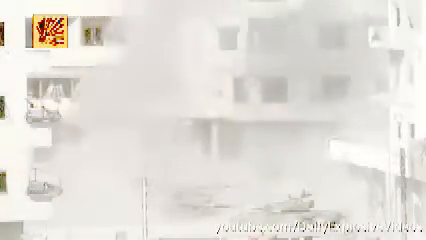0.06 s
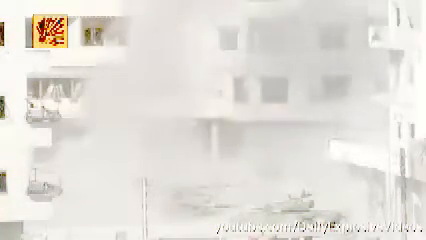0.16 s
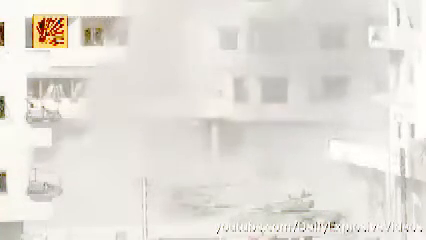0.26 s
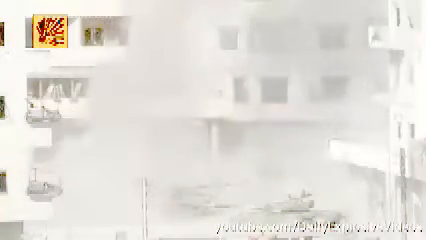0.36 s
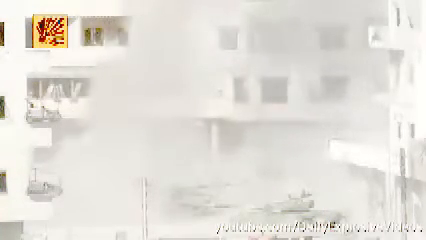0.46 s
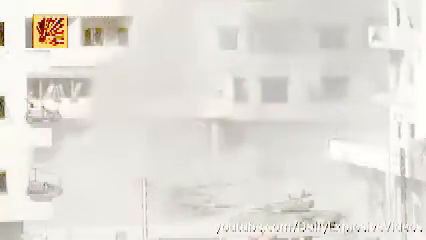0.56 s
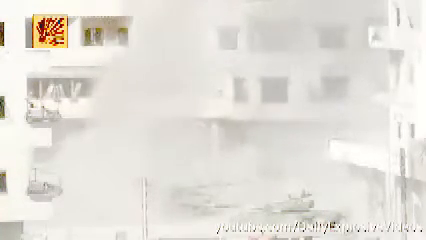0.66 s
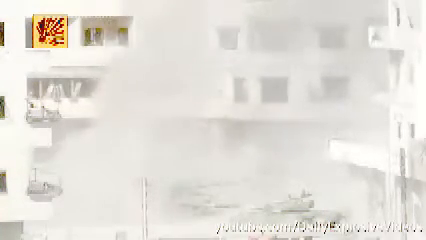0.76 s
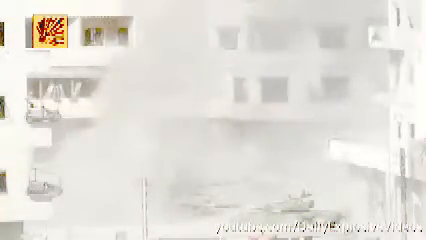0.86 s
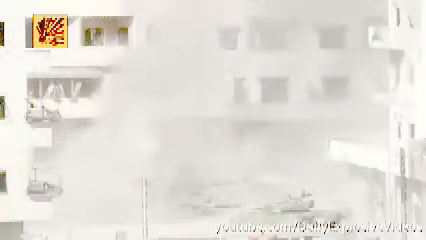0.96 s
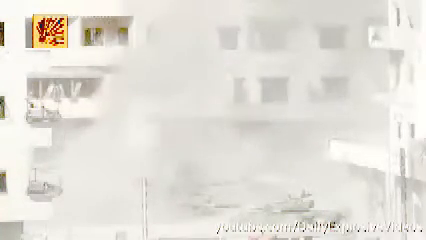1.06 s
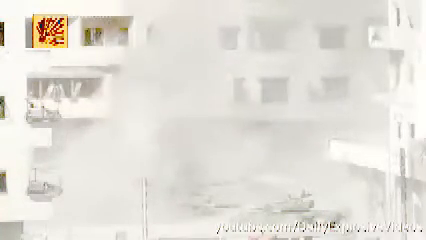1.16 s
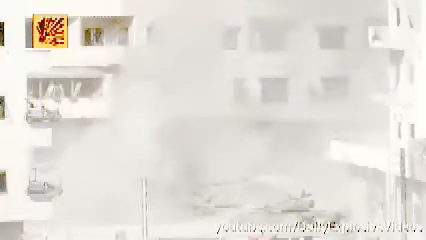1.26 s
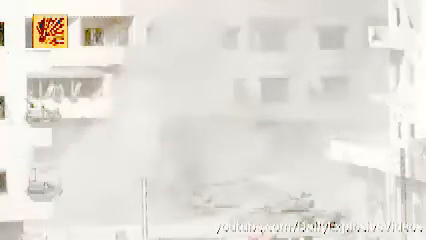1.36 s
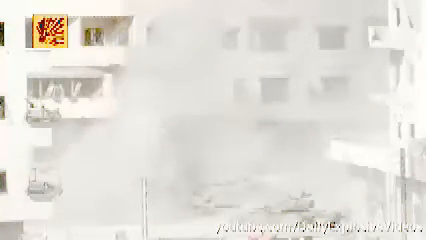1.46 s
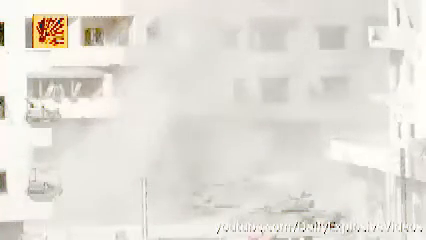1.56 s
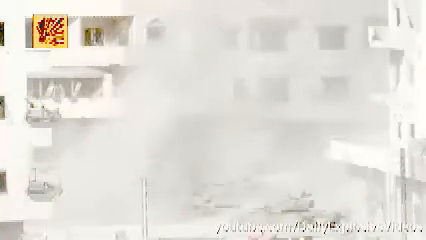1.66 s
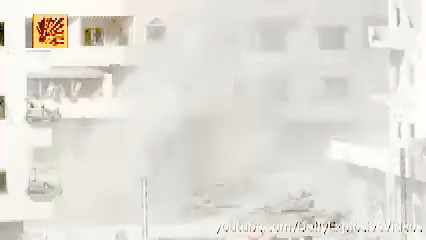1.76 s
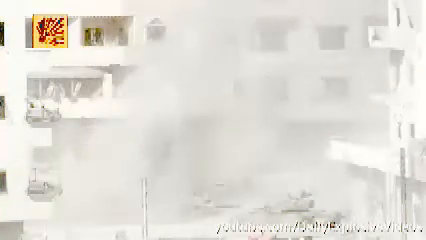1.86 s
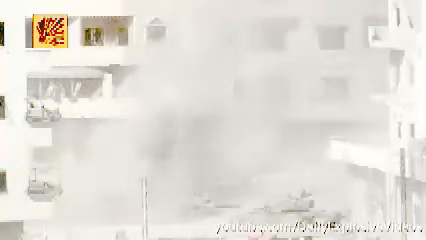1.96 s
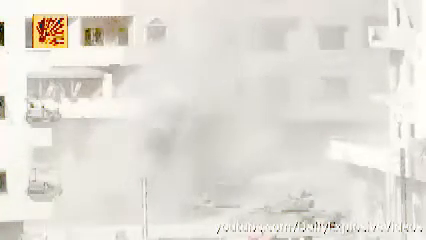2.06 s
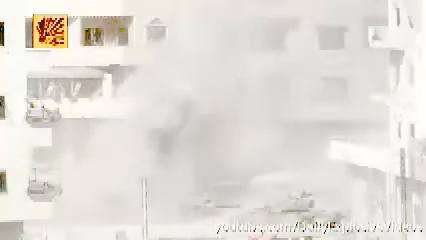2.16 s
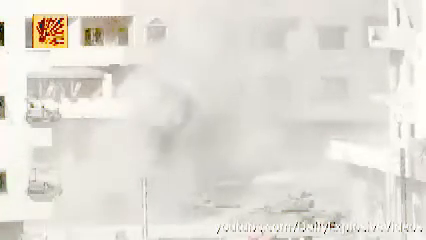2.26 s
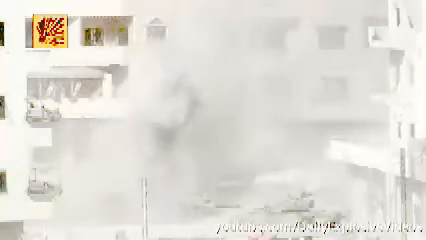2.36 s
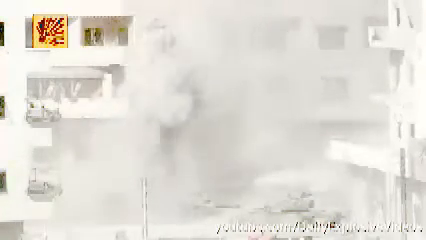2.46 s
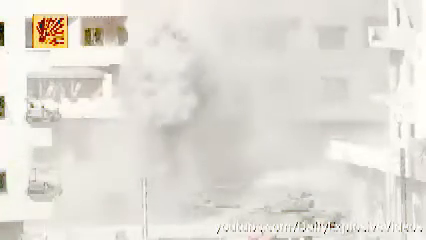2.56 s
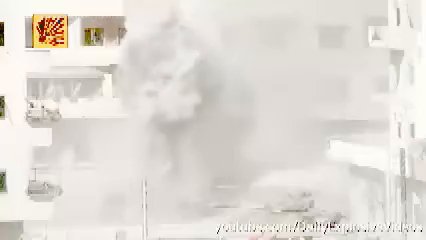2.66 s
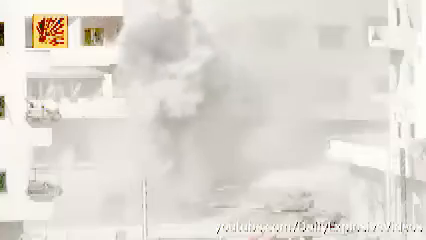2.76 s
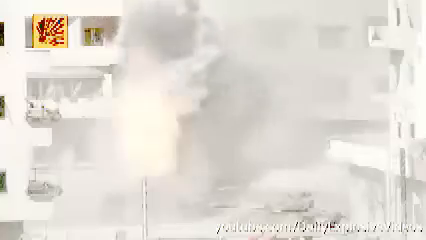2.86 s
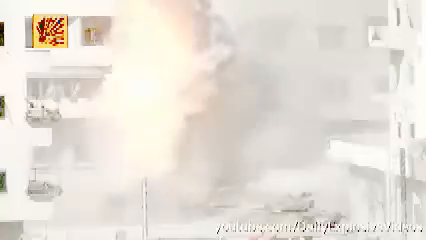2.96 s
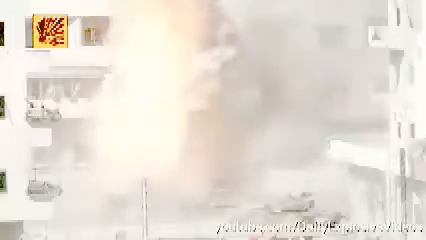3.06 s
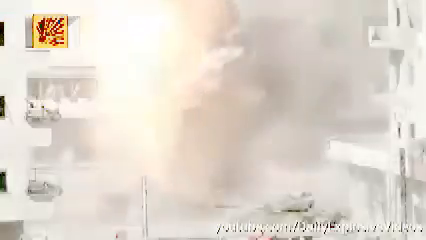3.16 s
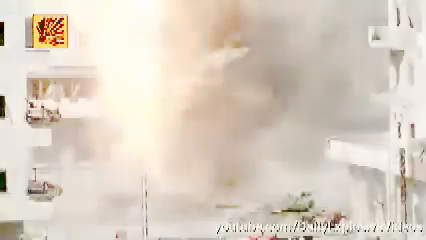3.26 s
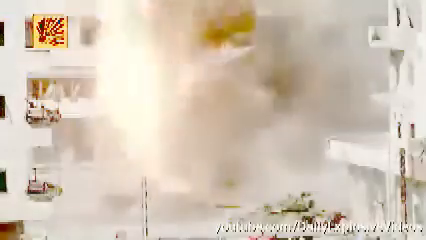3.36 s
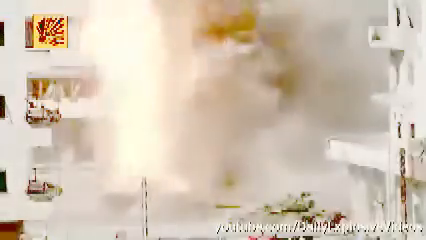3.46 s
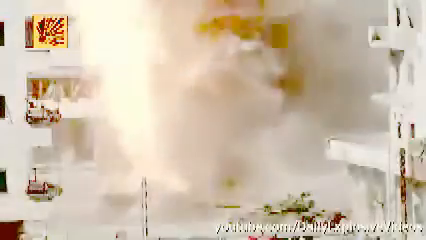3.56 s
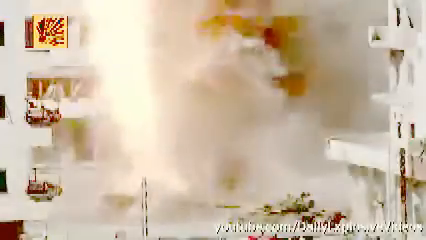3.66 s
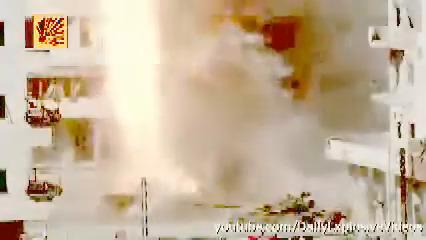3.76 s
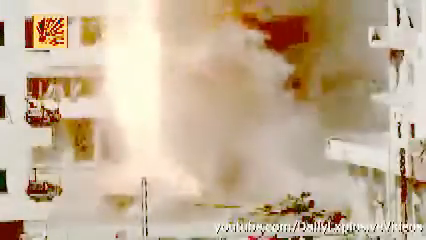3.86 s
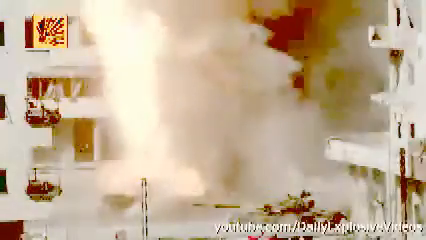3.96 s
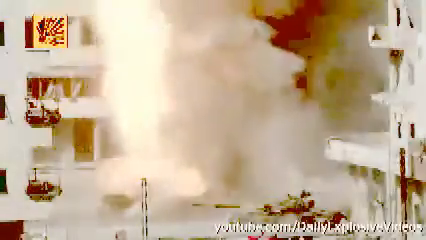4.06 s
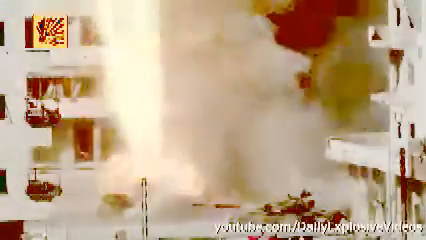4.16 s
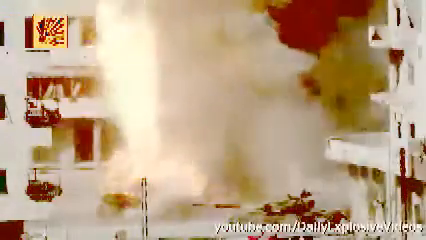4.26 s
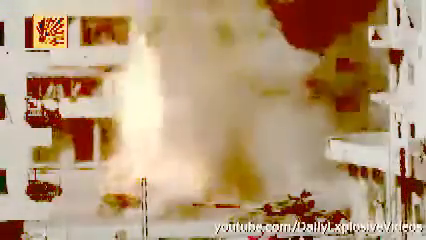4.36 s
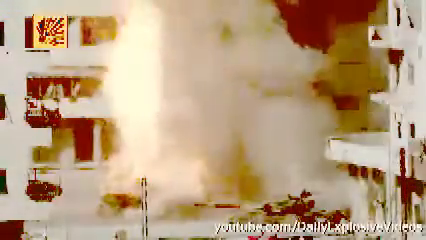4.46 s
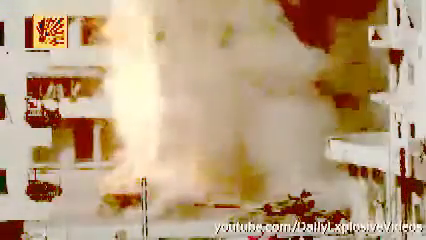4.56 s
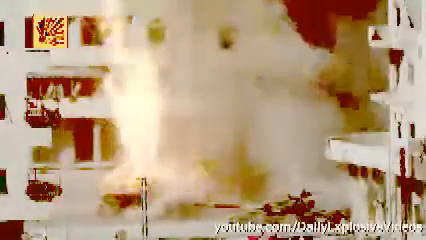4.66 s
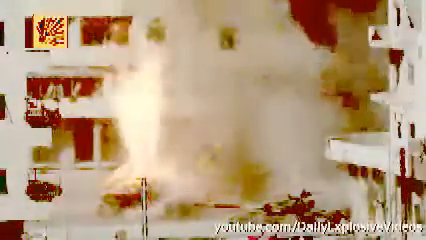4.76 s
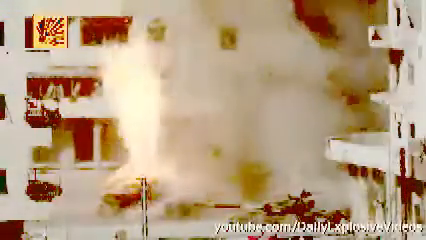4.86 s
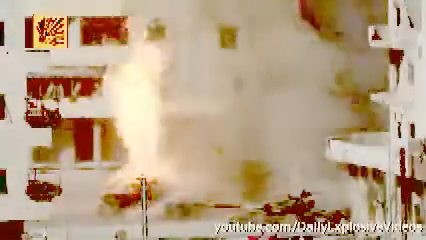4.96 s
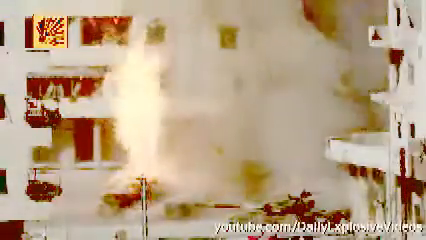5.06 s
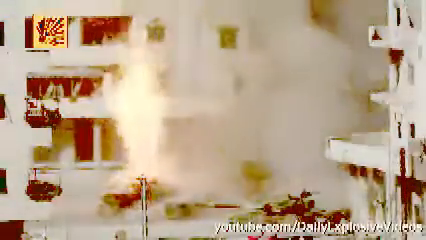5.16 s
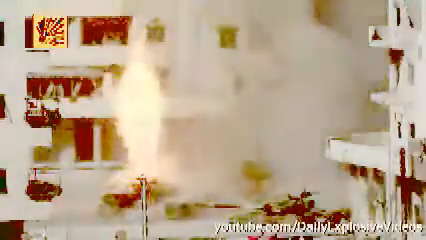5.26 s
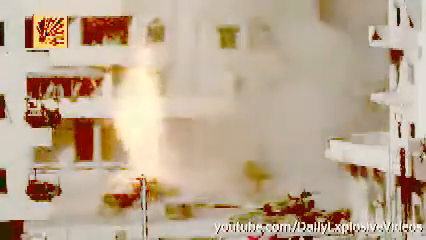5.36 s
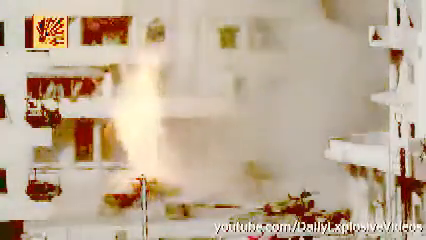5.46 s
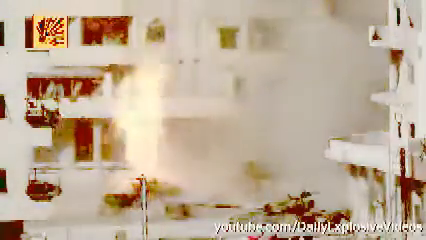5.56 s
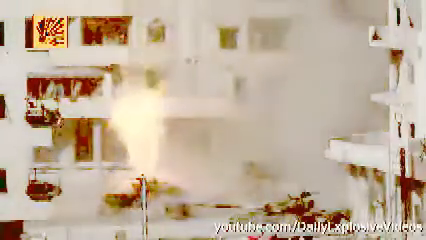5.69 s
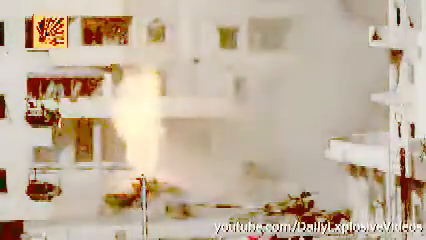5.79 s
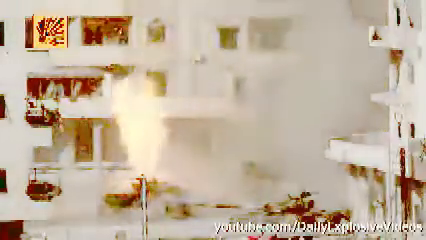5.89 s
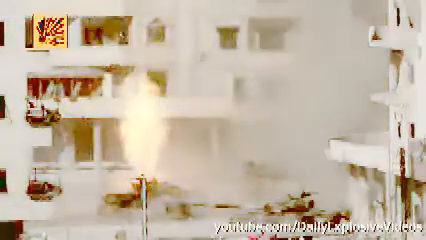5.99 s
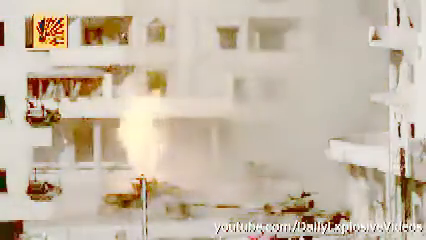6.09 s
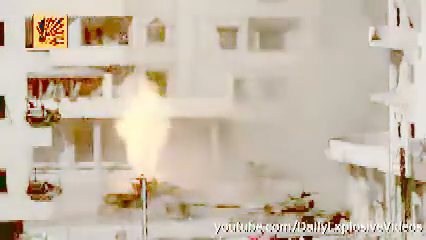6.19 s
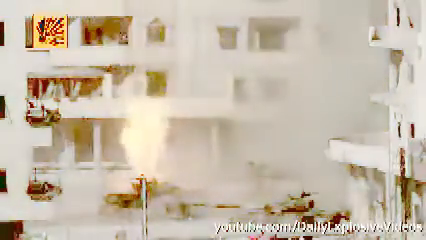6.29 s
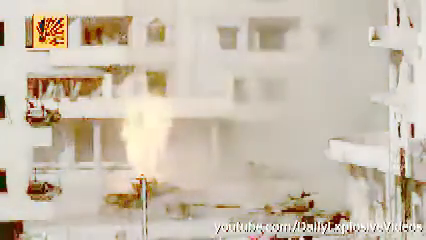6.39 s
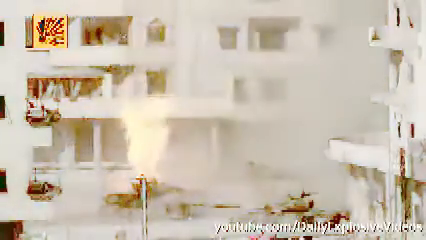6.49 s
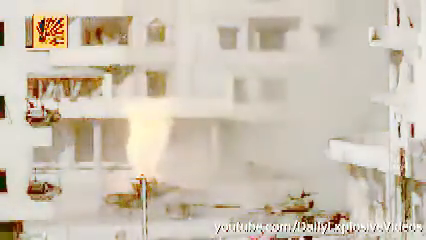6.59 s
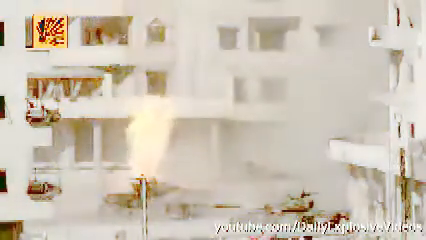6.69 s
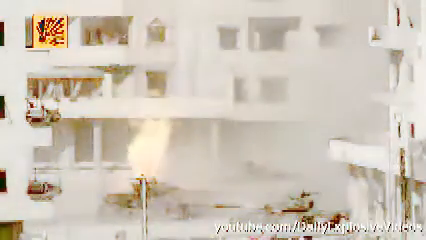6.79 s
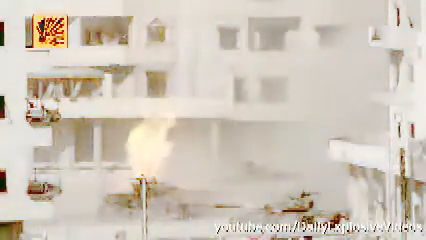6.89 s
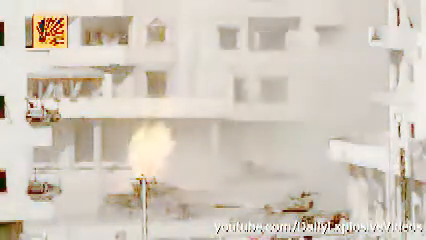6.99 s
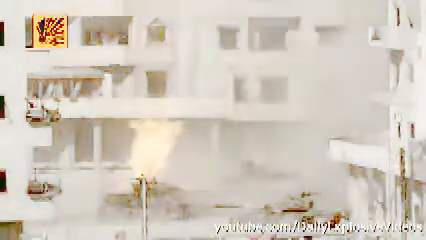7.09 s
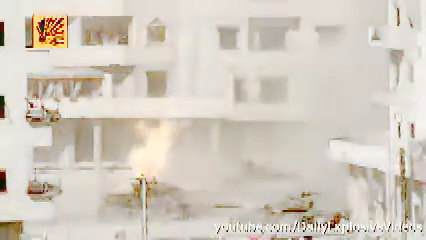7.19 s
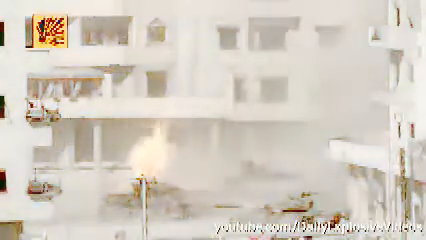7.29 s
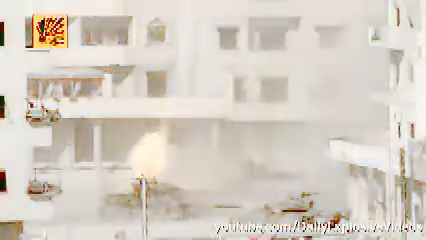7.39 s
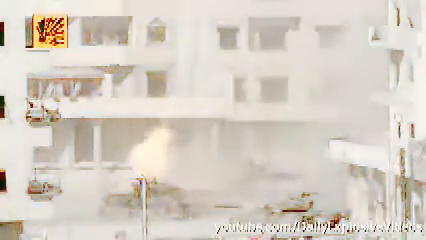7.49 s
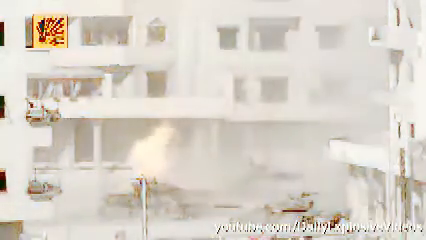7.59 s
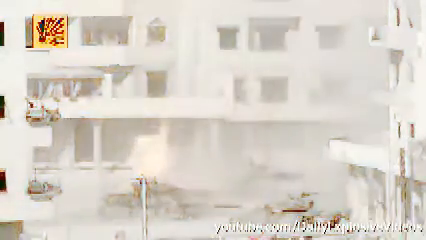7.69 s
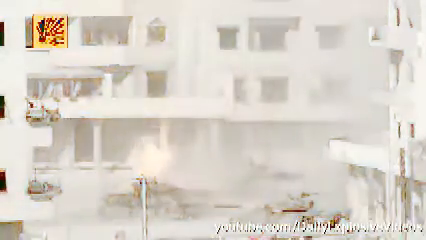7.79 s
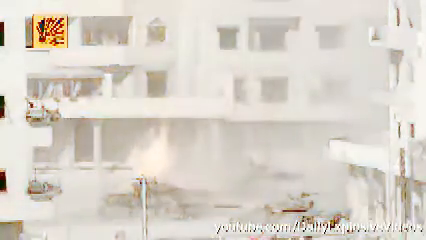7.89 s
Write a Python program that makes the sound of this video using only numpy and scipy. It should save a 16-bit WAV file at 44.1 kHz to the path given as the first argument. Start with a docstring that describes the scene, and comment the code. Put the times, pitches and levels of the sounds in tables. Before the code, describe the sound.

Muffled blasts thud between buildings before a rushing, rumbling roar of fire swells and dies away under a few sharp ammunition cracks.

```python
"""A tank burns in a street between concrete blocks, heard from far off through a small camera.
At first, dull shell thuds reflect from the walls over the low rumble of the town and the fire.
Just after 4 s the charge blows out as a turbulent jet of flame, and the hull resonates with it.
From about 6 s, as the roar slowly dies, rounds crack off as sharp shock fronts with short echoes."""
import sys
import numpy as np
from scipy import signal
from scipy.fft import rfft, irfft, next_fast_len
from scipy.io import wavfile
from scipy.ndimage import uniform_filter1d

SR = 44100
rng = np.random.default_rng(int(sys.argv[2]) if len(sys.argv) > 2 else 0)


def unload_audio(sound):
    """Save the sound as a 16-bit wav file, at the path given as the first command line argument."""
    columns = np.transpose(np.atleast_2d(sound))
    # keep every value between -1 and 1, then stretch to whole-number steps
    steps = np.round(np.clip(columns, -1, 1) * 32767)
    wavfile.write(sys.argv[1], SR, steps.astype(np.int16))


N = 349801

# blasts and their reflections: t/s, peak before filtering/dB, centre f/Hz, bright part/dB, cluster/s
THUDS = [(0.149, -31, 246.7, -32, 0.025), (1.9146, -22.5, 330, -5.5, 0.013),
         (1.9253, -19, 666, -9.5, 0.006), (1.9325, -22, 557, -8, 0.003), (1.945, -27, 420, -9, 0.025),
         (2.039, -29.5, 314.6, -11, 0.027), (2.065, -19.5, 306.6, -18.5, 0.03),
         (3.075, -12.5, 483.3, -8, 0.012), (3.088, -16, 640, -9.5, 0.011), (3.097, -21, 240, -9, 0.016),
         (3.119, -25.5, 228.7, -9, 0.02), (3.202, -26, 246, -10.5, 0.018),
         (3.219, -18.5, 716, -23.5, 0.034), (3.3843, -12, 555.7, -16, 0.023),
         (3.3976, -14, 908, -9.5, 0.012), (3.4077, -19, 210, -8.5, 0.008),
         (3.441, -19.5, 299, -12.5, 0.026), (3.5083, -9, 708, -27, 0.0055), (3.525, -20, 524, -12, 0.03),
         (3.565, -22.5, 378, -20, 0.036), (3.621, -19.5, 502, -10, 0.03), (3.692, -24.5, 421, -10.5, 0.02),
         (3.705, -23, 351, -8, 0.029), (3.7446, -14.5, 854, -13, 0.013), (3.766, -23.5, 464, -7.5, 0.027),
         (3.822, -21.5, 853, -11, 0.045), (3.995, -21, 458, -9.5, 0.015), (4.084, -11.5, 259, -26.5, 0.031),
         (4.108, -21, 199.2, -22.5, 0.038), (4.14, -17, 239.4, -15, 0.046)]


def roar():
    """Turbulent combustion radiates broadband noise: body and rush, joined by hiss, hull and bass."""
    levels = [(0.0, -41, -52), (0.95, -41, -49.5), (1.87, -41.5, -45.5), (2.1, -36, -41.5),
              (2.58, -40, -42), (3.05, -37.5, -41.5), (3.6, -34, -37.5), (3.95, -34.5, -36.5),
              (4.13, -31.5, -34.5), (4.25, -24.5, -30), (4.32, -20, -28), (4.54, -21, -28.5),
              (4.61, -21.5, -31), (4.69, -22.5, -27), (4.76, -21, -30), (4.86, -20, -27.5),
              (4.94, -20, -27), (5.1, -22.5, -27.5), (5.28, -22, -26), (5.4, -21.5, -28),
              (5.99, -27.5, -33), (6.54, -27, -36), (7.09, -31.5, -36.5), (7.75, -38.5, -44.5),
              (7.93, -43, -43)]  # fire: t/s, body level/dB, rush level/dB
    body_spectrum = [(30, -75.5), (60, -40.5), (95, -17), (130, -5.5), (170, -4.5), (250, 3), (480, -0.5),
                     (600, -2), (680, -5), (900, -10), (1500, -15), (2500, -77), (5000, -120)]  # low roar: f/Hz, level/dB
    rush_spectrum = [(100, -90.5), (450, -25), (750, 0), (1100, -4.5), (1700, -6.5), (2100, -12),
                     (2900, -19.5), (3500, -27), (4100, -35.5), (5200, -48), (8500, -81.5)]  # midrange rush: f/Hz, level/dB
    body_gain, rush_gain = follow(levels)
    pops = gain_of(4.3 * np.minimum(rng.exponential(1, N), 4))  # small bursts of burning charge
    pops *= rng.random(N) < 1500 / SR
    pops *= rng.choice([-1., 1.], N)
    body = turbulence(body_spectrum, patchy_db=1.0, gusty_db=0.18, size=1024)
    rush = turbulence(rush_spectrum, patchy_db=2.0, gusty_db=0.49, size=512)
    rush += 0.29 * unit_rms(colour(pops, rush_spectrum))
    return body_gain * body + rush_gain * unit_rms(rush) + surging_hiss(pops) + hull() + bass()


def surging_hiss(pops):
    """Hiss in surges: jet noise of the flame until about 6.5 s, then scattered echoes of the cracks."""
    surges = [(4.1, -62), (4.24, -40), (4.275, -36), (4.3, -27), (4.36, -27.5), (4.4, -28), (4.45, -30),
              (4.48, -39), (4.52, -32), (4.61, -46.5), (4.73, -47), (4.76, -35.5), (4.87, -41), (4.92, -34),
              (5.02, -38.5), (5.29, -33.5), (5.43, -42), (5.49, -36), (5.66, -42), (5.85, -53), (6.18, -46),
              (6.45, -51.5), (6.94, -63.5), (6.99, -37.5), (7.05, -53), (7.2, -51), (7.235, -44),
              (7.3, -68)]  # hiss strength: t/s, level/dB
    spectrum = [(200, -83.5), (1000, -7.5), (1700, -3.5), (2500, 0), (3200, -5), (4100, -20.5), (5200, -31),
                (6500, -39.5), (8500, -53)]  # hiss colour: f/Hz, level/dB
    spits_per_s, spit_db = 160, -12  # separate bright clicks in the hiss
    spits = rng.uniform(-0.69, 1, N) * (rng.random(N) < spits_per_s / SR)
    hiss = turbulence(spectrum, patchy_db=0.58, gusty_db=0.95, size=256)
    hiss += 0.35 * unit_rms(colour(pops, spectrum))
    hiss += gain_of(spit_db) * unit_rms(colour(spits, spectrum))
    return follow(surges)[0] * unit_rms(hiss)


def hull():
    """Resonance: the hull round the flame passes noise in narrow peaks."""
    resonances = [(250, -58), (330, -10.5), (375, 2.5), (420, -15.5), (485, 6.5), (540, -15), (630, -13.5),
                  (672, 3), (720, -22.5), (900, -7), (1100, -19.5), (1600, -67.5)]  # hull response: f/Hz, level/dB
    levels = [(4.15, -55.5), (4.35, -39.5), (4.6, -38.5), (4.78, -27), (4.88, -25.5), (5.0, -28.5),
              (5.15, -35.5), (5.26, -26.5), (5.36, -33.5), (5.6, -31.5), (6.1, -34.5), (6.6, -35.5),
              (7.2, -50)]  # hull ringing: t/s, level/dB
    return follow(levels)[0] * turbulence(resonances, patchy_db=1.5, gusty_db=2.4, size=2048)


def thuds():
    """Multipath arrival: each blast is a cluster of blunt pulses off walls; returns direct, echo feed."""
    bright_spectrum = [(300, -30.5), (600, -5.5), (1100, -5.5), (1600, -11), (2200, -17), (2800, -19.5),
                       (3400, -26), (4100, -36.5), (5300, -48), (7000, -79), (9000, -100)]  # noisy part of a blast: f/Hz, level/dB
    path = [(25, -41.5), (60, -26.5), (110, 4.5), (1500, -3), (3000, 2.5), (4500, -14.5), (7000, -76)]  # filtering by distance and walls: f/Hz, gain/dB
    gap_cycles, bright_rise_s, feed_db = 1.2, 0.0067, -4.5
    direct, edge, feed = np.zeros((3, N))
    t = np.arange(6000) / SR
    chance = rng.random((len(THUDS), 3, len(t)))
    for (s, db, hz, bright_db, length), (spacing, sign, noise) in zip(THUDS, chance):
        fade = np.exp(-(t / length) ** 2.5) * np.minimum(t / 0.0029, 1)
        arrivals = np.cumsum((.4 + 1.2 * spacing) * gap_cycles * SR / hz).astype(int)
        slaps = np.isin(np.arange(len(t)), arrivals) * np.sign(sign - .5) * (0.66 + noise * 0.7) * fade
        slaps[0] = 1.58  # the first arrival
        phase = 2 * np.pi * hz * t[:800]
        blunt = signal.oaconvolve(slaps, np.sin(phase) * np.exp(-.22 * phase))[:len(t)]
        blunt *= gain_of(db) / abs(blunt).max()
        build = 0.48 + 0.46 * np.minimum(t / bright_rise_s, 1)  # brightness grows as slaps gather
        bright = gain_of(db + bright_db) * unit_rms(colour(noise - .5, bright_spectrum)) * fade * build
        add(direct, s, blunt)
        add(edge, s, bright)
        add(feed, s, gain_of(feed_db) * (blunt + bright))
    return colour(direct, path) + edge, colour(feed, path)


def cracks():
    """Shock waves: each front snaps and rings briefly between near walls; returns direct, echo feed."""
    # rounds and their far reflections: t/s, level/dB, ring f/Hz, hold/s, ring T60/s, treble gain/dB
    rounds = [(6.1863, -20.5, 1260, 0.00061, .01, -2), (6.6733, -15.5, 1185, 0.0035, 0.0077, 4),
              (6.6747, -21.5, 2750, 0.0016, .008, -3), (6.681, -26.5, 2740, 0.0026, 0.011, -12),
              (6.699, -34, 2160, 0.002, 0.0098, -12), (6.7154, -14.5, 1370, 0.0022, 0.0086, 3),
              (6.744, -27, 1550, 0.0011, 0.0088, -13), (6.9055, -21, 1667, 0.0019, 0.0087, 3),
              (6.9102, -22.5, 2830, 0.0015, 0.01, -16), (6.9578, -13.5, 1430, 0.00064, 0.0081, 2),
              (6.975, -26.5, 1400, .001, 0.0074, -9), (6.989, -21, 1110, .0006, .008, -18),
              (7, -21, 1500, .001, 0.0073, -8), (7.0316, -21, 1260, 0.0014, 0.012, -19),
              (7.539, -17, 1410, 0.00063, 0.0079, 3.5), (7.541, -26, 2510, 0.0012, .006, -12),
              (7.583, -30.5, 1280, 0.0027, 0.02, -12)]
    shock_spectrum = [(500, -28), (1000, -2), (1900, 1), (2700, -7), (3500, -19), (4700, -28.5),
                      (6300, -37), (8500, -45)]  # opening pulse: f/Hz, level/dB
    snap_spectrum = [(500, -25), (900, 8.5), (1600, 6), (2600, -4), (3400, -17), (4200, -23.5), (6000, -35),
                     (8500, -49)]  # noise burst: f/Hz, level/dB
    shock_s, shock_db = .0008, -6
    ring_db, sag_depth, sag_s = -1, 0.46, .003
    snap_db, front_db, front_fall_s, feed_db = -11, -10, 0.001, -6
    direct, feed = np.zeros((2, N))
    t = np.arange(1500) / SR
    chance = rng.standard_normal((len(rounds), len(t)))
    shock = colour(np.sinc((t - shock_s) * SR), shock_spectrum)
    shock = gain_of(shock_db) * shock / shock.max() * np.minimum(t / shock_s, 1)
    rise = np.sin(np.pi / 2 * np.minimum(t / 0.00082, 1)) ** 2
    for (s, db, hz, hold, t60, treble_db), noise in zip(rounds, chance):
        late = np.maximum(t - hold, 0)
        cycles = np.cumsum(hz * (1 + sag_depth * (np.exp(-t / sag_s) - .5))) / SR  # starts sharp, sags
        cycles -= np.interp(shock_s, t, cycles)  # a crest coincides with the shock
        ring = np.cos(2 * np.pi * cycles) * gain_of(ring_db - 60 * late / t60)
        noise = colour(noise, snap_spectrum)
        noise /= np.sqrt(uniform_filter1d(noise ** 2, size=150))  # flatten the envelope
        front = gain_of(front_db) * np.exp(-(late / front_fall_s) ** 2)
        snap = noise * (front + gain_of(snap_db - 60 * (t / (2.06 * t60 + hold)) ** 2))
        crack = gain_of(db) * (rise * (ring + snap) + shock)
        add(direct, s, colour(crack, [(2300, 0.0038), (4500, treble_db)]))
        add(feed, s, gain_of(db + feed_db) * rise * snap)
    return direct, colour(feed, [(1000, 1.5), (4000, 4.0), (7000, -8.0)])  # echoes lose their top


def street(x):
    """Reverberation: sparse reflections of random sign, each band decaying at its own rate."""
    decay_times = [(80, 1), (300, 0.72), (1000, 0.25), (4000, 0.47)]  # reverberation time: f/Hz, T60/s
    taps = np.zeros(SR)
    slots = np.arange(200, SR - 20, 20)
    taps[slots + rng.integers(0, 20, len(slots))] = rng.choice([-1., 1.], len(slots))
    hz, t, bands = signal.stft(taps, SR, nperseg=512)
    tail = signal.istft(bands * gain_of(-60 * t / read(decay_times, hz)[:, None]), SR, nperseg=512)[1]
    return signal.fftconvolve(x, tail / np.linalg.norm(tail))[:N]


def bass():
    """Incoherent addition: the boom and deep rumble under the fire sum in power with the ground shake."""
    levels = [(0.0, -52.5, -48), (0.85, -46, -48.5), (1.39, -52, -56.5), (1.87, -47.5, -61),
              (2.5, -42.5, -56), (2.9, -43.5, -44), (3.6, -36, -44), (4.02, -33, -36.5),
              (4.14, -30.5, -29.5), (4.3, -30, -29.5), (4.45, -26, -37), (4.79, -30, -31),
              (4.9, -32, -38.5), (5.4, -28.5, -36), (5.68, -35.5, -33.5), (6.0, -35, -35),
              (6.54, -32.5, -35.5), (7.3, -36, -36), (7.93, -45.5, -45.5)]  # bass: t/s, boom level/dB, rumble level/dB
    boom_spectrum = [(30, -76.5), (60, -36), (95, -18.5), (135, 14.5), (175, 10.5), (240, -7.5), (400, -53),
                     (900, -120)]  # boom: f/Hz, level/dB
    rumble_spectrum = [(15, -72), (28, -15.5), (40, -20.5), (52, -4.5), (75, 1), (100, 0.5), (140, -17.5),
                       (260, -67.5), (600, -130)]  # deep rumble: f/Hz, level/dB
    (boom_gain, rumble_gain), shake = follow(levels), ground_shake()
    boom = turbulence(boom_spectrum, patchy_db=2.0, gusty_db=0.29, size=2048)
    rumble = turbulence(rumble_spectrum, patchy_db=0.44, gusty_db=1.3, size=4096)
    return np.hypot(boom_gain, gain_of(4.0) * shake) * boom + np.hypot(rumble_gain, shake) * rumble


def ground_shake():
    """Damped vibration: the gain of the ground rumble swells after each thud and decays exponentially."""
    coupling_db, rise_s, fall_db_per_s = -26, 0.024, 43
    onsets, peak_db = np.array(THUDS).T[:2, :, None]
    grid = np.arange(0, N, 64)
    since = grid / SR - onsets
    gains = gain_of(peak_db + coupling_db - fall_db_per_s * abs(since)) * np.clip(since / rise_s, 0, 1)
    return np.interp(np.arange(N), grid, np.sqrt((gains ** 2).sum(0)))


def ports(x):
    """Partial coherence: two close microphone ports share one wave, plus a part of wandering phase."""
    lean_spectrum = [(30, -3), (60, -6.5), (95, -6.5), (150, -10.5), (230, -17), (370, -25.5), (600, -25.5),
                     (1500, -36.5), (4000, -60)]  # bass share gained on the right, lost on the left: f/Hz, gain/dB
    lean_depth = [(0, 0.5), (1.4, -3), (2.5, -2), (3.5, 1), (4.3, -0.5), (5.5, 0), (6.5, -0.5), (7.93, 0.5)]  # depth of that lean: t/s, gain/dB
    unshared_spectrum = [(30, -23), (70, -25), (150, -23), (400, -29), (1000, -25.5), (2000, -29.5),
                         (3500, -49.5), (6000, -50)]  # incoherent share: f/Hz, gain/dB
    wander_rate = 10.12  # random walk of phase, rad/sqrt(s)
    phase = uniform_filter1d(np.cumsum(rng.standard_normal(N)) * wander_rate / np.sqrt(SR), size=400)
    analytic = signal.hilbert(x, next_fast_len(N))[:N]
    unshared = colour((analytic * np.exp(1j * phase)).real, unshared_spectrum)
    side = unshared - follow(lean_depth)[0] * colour(x, lean_spectrum)
    return np.array([x + side, x - side])


def camera_noise():
    """Electronic self-noise: faint hiss, partly different in each channel, and a thin whine."""
    spectrum = [(3000, -28), (4500, -7), (5500, 0), (6500, -2), (8000, -2.5), (8800, -10)]  # hiss colour: f/Hz, level/dB
    levels = [(0, -86), (.7, -83.5), (2.3, -75.5), (3.6, -75.5), (4.2, -79), (5.9, -88.5), (7.2, -78.5),
              (7.93, -77)]  # hiss strength: t/s, level/dB
    tones = [(7800, -97), (7826, -95)]  # steady whine: f/Hz, rms level/dB
    t = np.arange(N) / SR
    whine = sum(np.sqrt(2) * gain_of(db) * np.sin(2 * np.pi * hz * t) for hz, db in tones)
    shared, side = (turbulence(spectrum, patchy_db=1.5, gusty_db=.6, size=512) for _ in range(2))
    return follow(levels)[0] * (shared + .38 * side * [[1], [-1]]) + whine


def turbulence(points, patchy_db, gusty_db, size):
    """Random modulation: unit-rms noise with drifting spectral patches and gusts common to all bands."""
    hop = size // 4
    frames, hz = N // hop + 5, np.fft.rfftfreq(size, 1 / SR)
    real, imag, patches = rng.standard_normal((frames, len(hz), 3)).T
    patches = unit_rms(uniform_filter1d(uniform_filter1d(patches, size=9, axis=0), size=12, axis=1))
    gusts = unit_rms(uniform_filter1d(rng.standard_normal(frames), size=6))
    bands = (real + 1j * imag) * gain_of(read(points, hz)[:, None] + patchy_db * patches + gusty_db * gusts)
    return unit_rms(signal.istft(bands, nperseg=size, noverlap=size - hop)[1][:N])


def gain_of(db):
    """Amplitude ratio of a level in decibels."""
    return 10 ** (np.asarray(db) / 20)


def unit_rms(x):
    """Normalisation to unit power."""
    return x / np.sqrt(np.mean(x ** 2) + 1e-20)


def read(points, hz):
    """Interpolation of a table on a log frequency axis."""
    f, value = np.transpose(points)
    return np.interp(np.log(hz + 1), np.log(f + 1), value)


def follow(curve):
    """Amplitude envelope for each level column; silent outside the curve."""
    s, *columns = np.transpose(curve)
    return [gain_of(np.interp(np.arange(N) / SR, s, db, -200, -200)) for db in columns]


def colour(x, points):
    """Zero-phase filtering of the last axis by a spectrum table."""
    size = next_fast_len(x.shape[-1])
    response = gain_of(read(points, np.fft.rfftfreq(size, 1 / SR)))
    return irfft(rfft(x, size) * response, size)[..., :x.shape[-1]]


def low_pass(x, hz):
    """Steep band limit by a windowed sinc."""
    return signal.oaconvolve(x, signal.firwin(511, hz, window=("kaiser", 9), fs=SR)[None], "same")


def add(mix, s, sound):
    """Superposition of a sound on the mix at s seconds."""
    part = mix[round(s * SR):][:len(sound)]
    part += sound[:len(part)]


def scene():
    """Superposition of fire, thuds, cracks and street echoes at the two ports, over the self-noise."""
    (thud, thud_feed), (crack, crack_feed) = thuds(), cracks()
    return ports(roar() + thud + crack + street(thud_feed + crack_feed)) + camera_noise()


def record(dry):
    """Saturation rounds the peaks; imaging from a half-rate signal faintly mirrors the treble."""
    image_spectrum = [(12600, -68), (13500, -15), (14300, -4.5), (15700, -14)]  # treble mirrored about SR / 4: f/Hz, gain/dB
    ceiling, band_hz, edge_hz = .36, 8800, 15750
    narrow = low_pass(ceiling * np.tanh(dry / ceiling), band_hz)
    image = colour(narrow * (-1.) ** np.arange(N), image_spectrum)
    return low_pass(narrow + image, edge_hz)


dry = scene()
out = record(dry)
unload_audio(out)
```